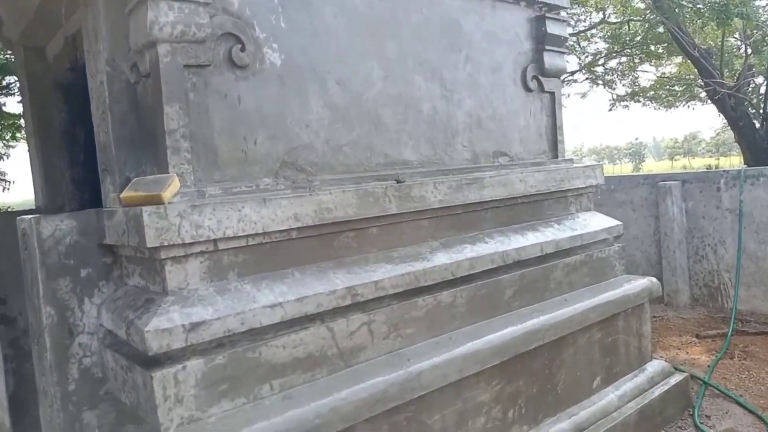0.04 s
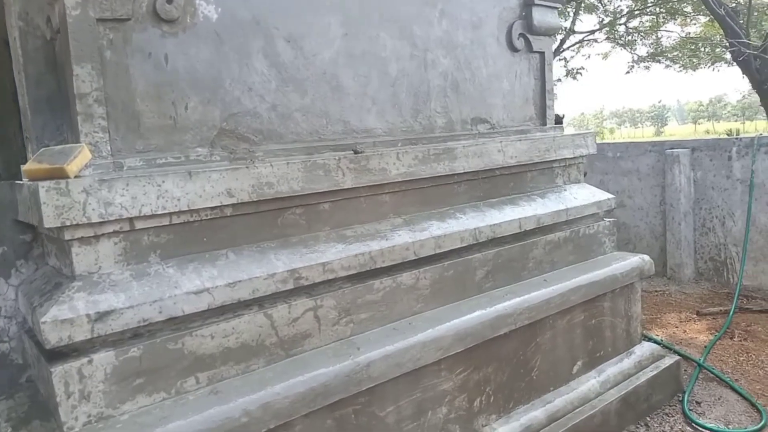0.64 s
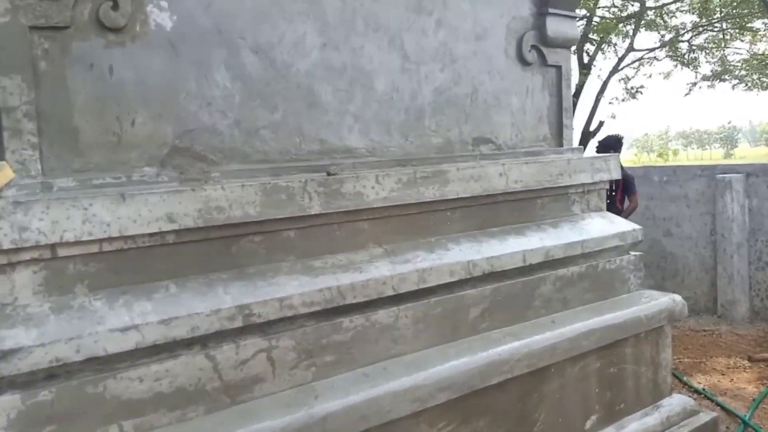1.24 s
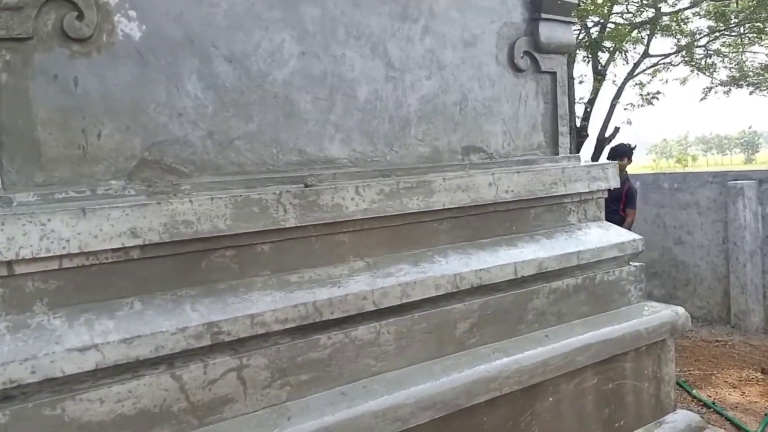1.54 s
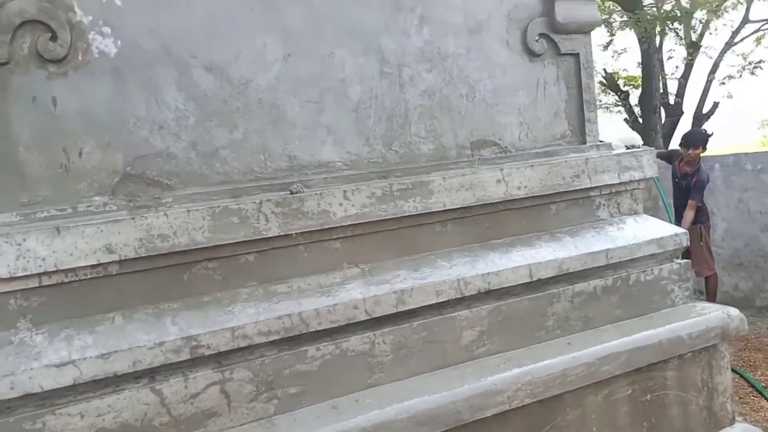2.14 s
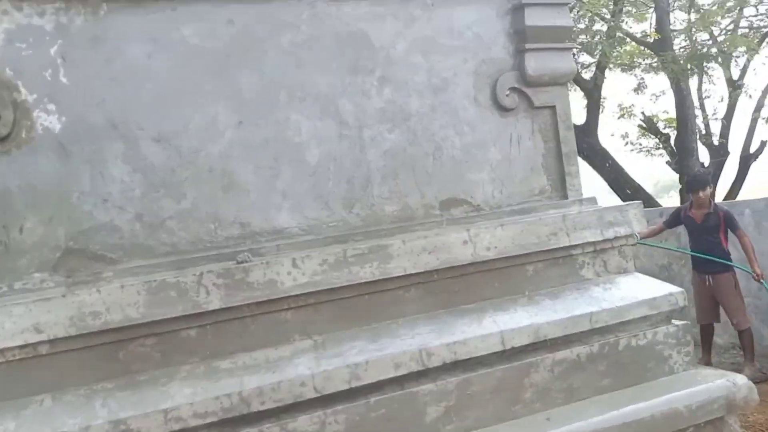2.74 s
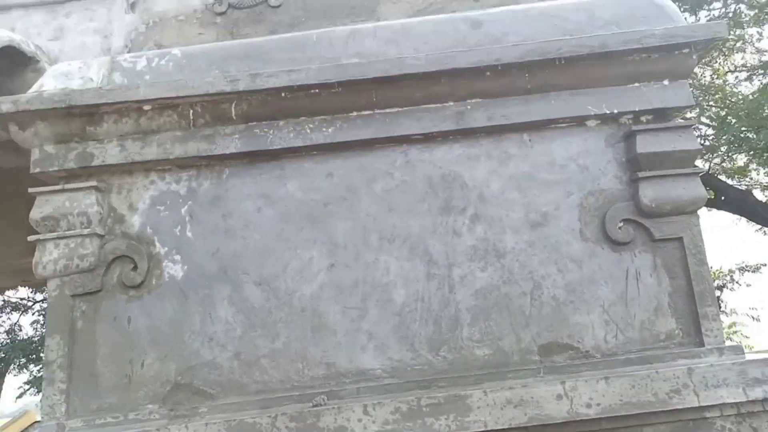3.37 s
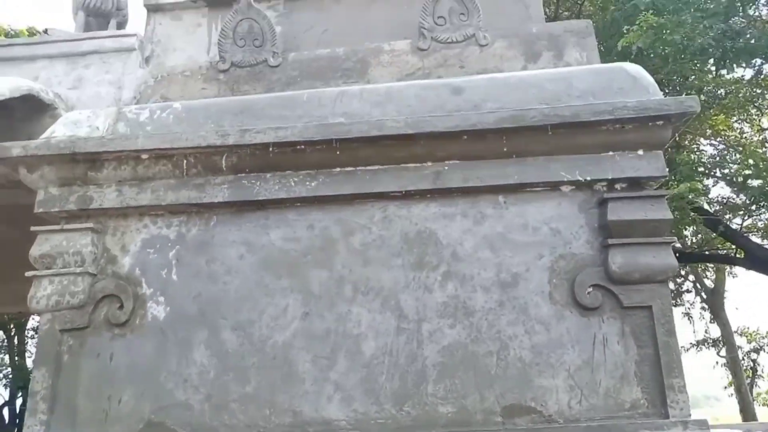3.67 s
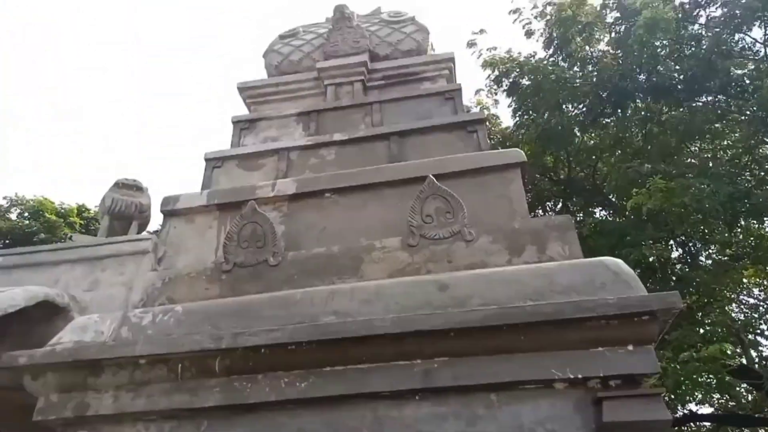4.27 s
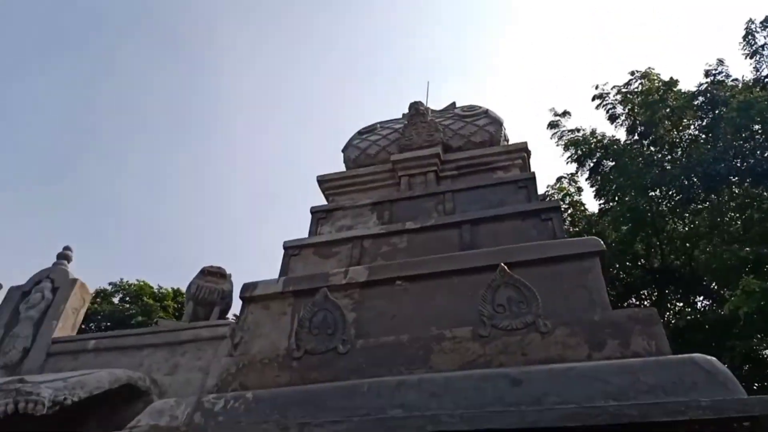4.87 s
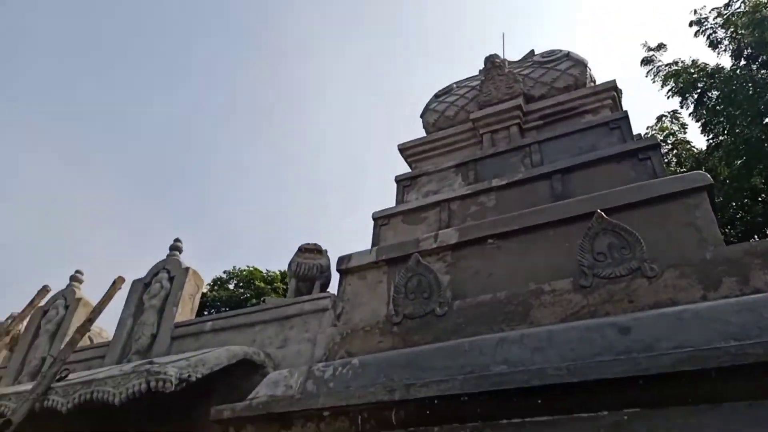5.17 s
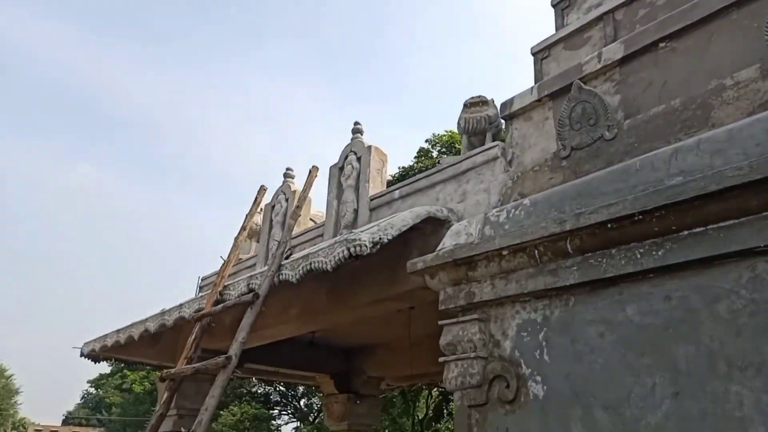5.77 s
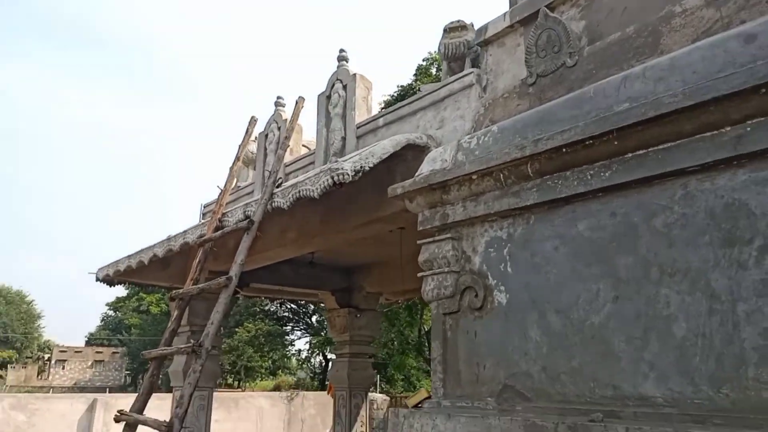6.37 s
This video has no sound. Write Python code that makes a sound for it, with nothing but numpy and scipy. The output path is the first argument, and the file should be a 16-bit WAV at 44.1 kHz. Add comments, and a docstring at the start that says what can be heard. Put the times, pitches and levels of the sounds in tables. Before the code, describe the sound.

Water from a garden hose splashes and hisses against concrete walls outdoors, with dripping and light wind rumbling on the microphone.

```python
"""A garden hose sprays the concrete walls of a building outdoors, a few metres away.
From the start the jet splashes on ledges, hisses as mist and drums on the flat wall, while
water spills down and single drops ring. Near 1.8 s water slaps the wall, then the strongest
gust of a light wind buffets the microphone. The spray is loudest from 3 to 3.6 s, and bubbles
plop in puddles just after. The jet sinks away around 5 s and swells again for the last second."""
import sys
import numpy as np
from scipy import signal
from scipy.fft import rfft, irfft
from scipy.io import wavfile

SR = 44100
rng = np.random.default_rng(int(sys.argv[2]) if len(sys.argv) > 2 else 0)


def pcm_store(signal):
    """Save signal as 16-bit PCM."""
    levels = np.round(np.clip(np.atleast_2d(signal), -1, 1) * 32767)
    wavfile.write(sys.argv[1], SR, levels.astype(np.int16).T)


N = 282681


def gain_of(db):
    """Turns decibels into a number to multiply a sound by."""
    return 10 ** (np.asarray(db) / 20)


def evened(x):
    """Scales a signal to an average strength (rms) of 1."""
    return x / np.sqrt(np.mean(x ** 2) + 1e-20)


def noise(length=N):
    """Plain white noise."""
    return rng.standard_normal(length)


def follow(rows):
    """Joins (time, value) points with straight lines, one value per sample."""
    times, values = np.transpose(rows)
    return np.interp(np.arange(N) / SR, times, values)


def add(mix, s, sound):
    """Mixes a sound in, starting at s seconds."""
    part = mix[max(round(s * SR), 0):][:len(sound)]
    part += sound[:len(part)]


def coloured(x, tone, size=8192):
    """Shapes bass and treble to a tone table; the filter never rings early, so hits stay sharp."""
    hz, db = np.transpose(tone)
    bins_hz = abs(np.fft.fftfreq(size, 1 / SR))
    log_gain = np.log(gain_of(np.interp(np.log(bins_hz + 1), np.log(hz), db)))
    taps = np.fft.ifft(np.exp(np.conj(signal.hilbert(log_gain)))).real[:size // 2]
    return signal.oaconvolve(x, taps)[:len(x)]


def resonate(x, hz, width_hz):
    """Rings at a fixed or moving pitch: shift down to zero, smooth twice, shift back."""
    turn = np.exp(2j * np.pi * np.cumsum(hz * np.ones(len(x))) / SR)
    r = np.exp(-np.pi * width_hz / SR)
    return evened((turn * signal.lfilter([1], [1, -2 * r, r * r], x / turn)).real)


def wander(rate_hz):
    """A random wobble, mostly slower than the given rate."""
    hz = np.fft.rfftfreq(N, 1 / SR)
    return evened(irfft(rfft(noise()) / (1 + (hz / rate_hz) ** 2), N))


def spells(rows, base_db, attack_s, release_s):
    """A loudness curve: spells that rise, hold and die away over a steady base."""
    t, power = np.arange(N) / SR, gain_of(base_db) ** 2
    for s, length, db in rows:
        shape = np.clip((t - s) / attack_s, 0, 1) * np.exp(-np.maximum(t - s - length, 0) / release_s)
        power = power + (gain_of(db) * shape) ** 2
    return np.sqrt(power)


def impacts(per_s, spread_db):
    """Drops hitting at random: many small clicks, a few large."""
    chance, side = rng.random((2, N))
    size = gain_of(spread_db * np.minimum(rng.exponential(1, N), 5))
    return size * np.sign(side - .5) * (chance < per_s / SR)


def ping(hz, cycles, glide, t, swell_cycles=0.35):
    """A pocket of air trapped by a drop: it swells, rings for some cycles and rises in pitch."""
    age = hz * t / cycles
    shape = (1 - np.exp(-(hz * t / swell_cycles) ** 2)) * np.exp(-age)
    return shape / shape.max() * np.sin(2 * np.pi * hz * t * (1 + glide * np.minimum(age, 2)))


def droplets(low_hz, high_hz, per_s, cycles, spread_db, most=6000, size=400):
    """A crowd of ringing drops, each with its own pitch and strength."""
    count = int(per_s * N / SR)
    when, pitch, weakness = rng.random((most, 3))[:count].T[:, :, None]
    hz = low_hz * (high_hz / low_hz) ** pitch
    height = gain_of(-spread_db * np.log(.02 + weakness))
    rings = height * np.sqrt(hz) * ping(hz, cycles, glide=0.013, t=np.arange(size) / SR)
    at = (when * N).astype(int) + np.arange(size)
    return evened(np.bincount(at.ravel(), rings.ravel(), N)[:N])


def yard(x, fade_s=0.17, echo_db=-7, count=24):
    """Adds quick echoes from the walls and the ground; later ones are weaker."""
    delay_s, side = rng.uniform(.004, .09, count), rng.choice([-1, 1], count)
    bounces = np.bincount((delay_s * SR).astype(int), side * gain_of(-60 * delay_s / fade_s))
    echoes = signal.oaconvolve(x, bounces / np.linalg.norm(bounces))[:N]
    return (x + gain_of(echo_db) * echoes) / np.sqrt(1 + gain_of(echo_db) ** 2)


# tone of the open air: f/Hz, level/dB
AIR_TONE = [(20, -13), (60, -27), (130, 6.5), (200, -0.5), (400, 2.5), (800, -8), (2300, 7.5), (4500, -8.5),
            (6700, 0), (7600, -34), (9000, -42), (12500, -44), (15400, -33)]

def air(level_db=-65.0):
    """The faint steady wash of the open yard."""
    return gain_of(level_db) * evened(coloured(noise(), AIR_TONE))


# tone of the wind's rumble: f/Hz, level/dB
WIND_TONE = [(15, -58), (30, -12), (50, -8), (72, -0.5), (95, -4), (125, -8.5), (160, -20.5), (250, -31),
             (600, -66)]
# gusts at the microphone: t/s, length/s, relative level/dB
GUSTS = [(0, 0.25, -66), (.27, 0.038, -53.5), (.56, 0.045, -59), (.88, 0.048, -47.5), (.97, 0.36, -50),
         (1.34, 0.097, -55.5), (1.53, .13, -60), (1.68, 0.18, -50), (1.89, 0.11, -42.5), (2.02, 0.12, -44),
         (2.19, 0.054, -57), (2.38, 0.044, -58), (2.49, 0.04, -55), (2.84, 0.045, -57),
         (2.96, 0.049, -56.5), (3.15, 0.078, -54), (3.33, .06, -54.5), (3.48, .09, -54), (3.62, .08, -51.5),
         (3.75, 0.03, -60), (4.61, 0.029, -65), (5.07, 0.054, -61), (5.58, 0.046, -63), (5.99, 0.037, -74)]
# sudden puffs: t/s, level/dB, f/Hz
PUFFS = [(0.899, -37.5, 86), (1.208, -34, 92), (1.236, -50, 82), (2.962, -45.5, 85), (3.621, -45, 89)]

def wind(puff_s=0.0041):
    """Swirls of air rumble on the microphone, with a few sudden thumps."""
    swirls = evened(coloured(noise(), WIND_TONE))
    gusts = spells(GUSTS, base_db=-80, attack_s=0.025, release_s=0.025)
    out = swirls * gusts * gain_of(-3.0 + 2.2 * wander(rate_hz=6.1))
    t = np.arange(SR // 10) / SR
    shape = t / puff_s * np.exp(1 - t / puff_s)
    for s, db, hz in PUFFS:
        add(out, s, gain_of(db) * shape * np.sin(2 * np.pi * hz * t))
    return out


# tone of the falling water: f/Hz, level/dB
RUNOFF_TONE = [(60, -30), (140, -14.5), (210, -1), (340, 2.5), (490, 3.5), (600, 2.5), (800, -7.5),
               (1200, -29), (3000, -43)]
# note of the hollow between the ledges: t/s, f/Hz
HOLLOW_NOTE = [(0, 500), (.8, 493), (1.0, 310), (2.5, 380), (3.6, 361), (3.9, 500), (4.4, 455), (4.55, 229),
               (5.3, 217), (6.41, 223)]
# water spilling off the ledges: t/s, length/s, relative level/dB
SPILLS = [(0, 0.28, -56), (.45, 0.28, -64.5), (.9, .26, -58), (1.2, 0.26, -65), (1.85, 0.11, -66.5),
          (2.6, 0.63, -63.5), (2.77, 0.061, -52.5), (3.12, 0.29, -54.5), (3.4, 0.28, -59),
          (3.87, 0.077, -61), (4.1, 0.053, -65.5), (4.31, 0.041, -53), (4.4, 0.22, -63.5),
          (4.79, 0.17, -67.5), (5.26, 0.056, -57.5), (5.52, 0.503, -59.5), (6.13, 0.064, -63),
          (6.38, .03, -56)]
# lumps of water landing: t/s, level/dB, f/Hz
THUDS = [(0.959, -59, 320), (3.125, -42.5, 852), (4.325, -54.5, 470), (4.495, -61, 228),
         (5.277, -53.5, 226), (5.994, -62, 218)]

def runoff(swell_s=0.015):
    """Water pours off the ledges and patters dully into a hollow; now and then a lump thuds down."""
    patter = evened(impacts(per_s=820, spread_db=2.0)) + 1.35 * noise()
    hollow = resonate(noise(), follow(HOLLOW_NOTE), width_hz=73)
    spill = spells(SPILLS, base_db=-70, attack_s=0.011, release_s=0.035)
    spill *= gain_of(-3.5 + 2.5 * wander(rate_hz=22))
    out = evened(evened(coloured(patter, RUNOFF_TONE)) + 0.41 * hollow) * spill
    t = np.arange(SR // 8) / SR
    shape = (t / swell_s * np.exp(1 - t / swell_s)) ** 2
    for s, db, hz in THUDS:
        add(out, s, gain_of(db) * shape * resonate(noise(len(t)), hz, width_hz=88))
    return out


# bubbles bursting in puddles: t/s, relative level/dB, f/Hz
BUBBLES = [(3.677, -44, 1160), (3.722, -38, 1034), (4.041, -45, 1210), (4.148, -43, 1100),
           (5.925, -47, 1080), (6.242, -45.5, 1060)]

def bubbles(trim_db=-3.5):
    """Larger bubbles plop with a slightly rising note."""
    t, out = np.arange(SR // 15) / SR, np.zeros(N)
    for s, db, hz in BUBBLES:
        add(out, s, gain_of(db + trim_db) * ping(hz, cycles=4.4, glide=0.012, t=t, swell_cycles=2.3))
    return out


# tone of a round smack: f/Hz, level/dB
SMACK_TONE = [(250, -22), (600, -20), (900, 16), (1600, 18.5), (2400, 12), (3500, -33), (6300, -54),
              (8600, -56)]
# tone of fine spray, also used by drops and mist: f/Hz, level/dB
SPRAY_TONE = [(2000, -15), (3200, -2.5), (3900, 1.5), (5100, 1), (5800, 3.5), (6600, 5), (7300, 0),
              (7800, -8.5), (8400, -18.5), (9500, -25.5), (12000, -45.5)]
# slaps on the wall: t/s, level/dB, share of spray (0 to 1), rise time/s
SLAPS = [(.824, -48, 1, 0.0017), (0.919, -40.5, .5, 0.0052), (1.53, -42, 1, 0.0051),
         (1.745, -44, 0, 0.0035), (1.754, -28.5, 0.41, 0.0016), (1.765, -29.5, 0.21, 0.0014),
         (1.776, -40, 0, 0.0016), (3.138, -37, 0.4, 0.0044), (3.804, -56, 0.4, 0.0024),
         (5.181, -53, 0.36, 0.0017), (5.959, -38, 0.86, 0.0014), (6.13, -51, 0.37, 0.0017)]

def slaps(tail_s=0.01, tail_gain=0.037):
    """A lump of water bursts on the concrete with a smack and scatters as spray."""
    t, out = np.arange(SR // 10) / SR, np.zeros(N)
    for s, db, bright, rise_s in SLAPS:
        shape = t / rise_s * np.exp(1 - t / rise_s) + tail_gain * np.exp(-t / tail_s)
        smack = evened(coloured(noise(len(t)), SMACK_TONE))
        spray = evened(coloured(noise(len(t)), SPRAY_TONE))
        add(out, s, gain_of(db) * shape * ((1 - bright) * smack + bright * spray))
    return out


# single fat drops: t/s, level/dB, f/Hz, tick compared with ring/dB
FAT_DROPS = [(.1, -37, 2080, -16), (.3595, -39, 1940, -15), (0.734, -28, 6260, -22),
             (.8354, -34.5, 2260, -16), (1.078, -34, 2380, -13), (1.4246, -31, 6530, -12),
             (1.685, -34.5, 1830, -15), (2.1892, -37.5, 1750, -1), (2.3307, -37, 2450, -16),
             (2.655, -31, 2220, -21), (2.9336, -31, 2180, -14), (2.946, -28, 7140, -18),
             (2.971, -32, 1900, -17), (3.084, -31.5, 2270, -20), (3.106, -29.5, 1970, -13),
             (3.418, -29.5, 2800, -19), (3.5594, -26.5, 2240, -20), (3.59, -25.5, 2250, -13),
             (3.615, -33.5, 1790, -10), (3.805, -34, 2740, -25), (4.116, -34.5, 2220, -20),
             (4.1677, -33.5, 2460, -21), (4.656, -40, 2650, -5), (4.696, -38, 2520, -16),
             (5.053, -43.5, 2330, -3.5), (5.093, -42, 3260, -4), (5.116, -41.5, 2830, -1),
             (5.3531, -42, 2300, -15)]

def drops(jet_db, tick_s=0.0019, stray_count=36, stray_hz=2250):
    """A fat drop gives a wet tick and a short ring; strays fall at random, louder with a strong jet."""
    t, out = np.arange(SR // 25) / SR, np.zeros(N)
    strays = []
    for when, big, high in rng.random((stray_count, 3)):
        db = jet_db[int(when * N)] + 8 + 4 * (big - .5)
        hz = stray_hz * 2 ** (0.78 * (high - .5))
        strays.append((when * N / SR, db, hz, -13))
    for s, db, hz, tick_db in FAT_DROPS + strays:
        tick = evened(coloured(noise(len(t)), SPRAY_TONE)) * np.exp(-t / tick_s)
        ring = ping(hz, cycles=6.9, glide=0.0056, t=t, swell_cycles=2.1)
        add(out, s, gain_of(db) * (ring + gain_of(tick_db) * tick))
    return out


# tone of the very high fizz: f/Hz, level/dB
FIZZ_TONE = [(5000, -30), (8000, 0), (9000, 1.5), (10000, -0.5), (11300, 0.5), (12600, -2.5), (14000, 3),
             (15400, 3)]

def fizz(hits):
    """The tiniest drops tick on their own, above the rest of the spray."""
    ticks = evened(impacts(per_s=3100, spread_db=7.0))
    return coloured(.5 * hits + 0.46 * ticks + 0.97 * noise(), FIZZ_TONE)


# tone of water hitting the bare wall: f/Hz, level/dB
DRUM_TONE = [(300, -35.5), (550, -15), (760, -3), (900, -3), (1100, 1.5), (1400, 0.5), (2000, 2.5),
             (4000, -31.5)]
# ringing of the wall's corner: t/s, strength (1 = as strong as the wall)
CORNER_RING = [(0, 0.91), (.8, 0.59), (1.3, 0.37), (2.5, 0.21), (2.8, 0.3), (3.4, 0.45), (3.7, .05),
               (5.4, 0.09), (6.41, 0.14)]

def drumming(hits, wash):
    """The bare wall answers with a lower sound, and its corner rings at one pitch."""
    gurgling = yard(droplets(567, 1723, per_s=300, cycles=3.9, spread_db=6.0))
    corner = follow(CORNER_RING) * resonate(noise(), hz=845, width_hz=244)
    return evened(coloured(hits + 1.28 * wash + 0.46 * gurgling, DRUM_TONE)) + corner


def mist(hits, wash):
    """Small drops bounce back, hissing and tinkling."""
    tinkling = yard(droplets(3350, 7640, per_s=450, cycles=11.8, spread_db=5.0))
    return coloured(hits + 1.59 * wash + 0.46 * tinkling, SPRAY_TONE)


# tone of the splash: f/Hz, level/dB
SPLASH_TONE = [(700, -33.5), (1300, -9.5), (1550, -7.5), (1800, -1.5), (2250, -0.5), (2700, 0),
               (3300, -2.5), (4500, -4), (7000, -12.5), (9000, -63.5)]
# note set by the film of water under the jet: t/s, f/Hz
FILM_NOTE = [(0, 2160), (1.0, 2070), (1.5, 2250), (1.8, 1990), (2.5, 2260), (3.6, 2270), (3.85, 2570),
             (4.1, 2340), (4.75, 2560), (5.25, 1960), (6.0, 2220), (6.3, 2500)]

def splash(hits, wash):
    """On wet ledges the drops trap air and ring, most near the note of the water film."""
    ringing = yard(droplets(1400, 3445, per_s=450, cycles=6.2, spread_db=2.0))
    film = resonate(impacts(per_s=1300, spread_db=3.5), follow(FILM_NOTE), width_hz=680)
    return evened(coloured(hits + 0.69 * wash + .5 * ringing, SPLASH_TONE)) + 0.49 * film


# the jet catches a ledge: t/s, rise time/s, fade time/s, splash level/dB, mist level/dB, drum level/dB
SURGES = [(.47, .03, 0.034, -47, -48, -54), (.815, 0.018, .035, -44, -44.5, -74),
          (.895, 0.04, 0.079, -48.5, -47.5, -47.5), (1.31, 0.023, 0.034, -51, -45.5, -52),
          (1.405, 0.02, 0.05, -54, -51, -69), (1.49, 0.024, 0.042, -49.5, -47, -73),
          (1.665, 0.019, 0.021, -46, -46.5, -58), (1.745, 0.022, 0.033, -41.5, -54, -45.5),
          (1.89, 0.013, 0.064, -50.5, -46.5, -64), (2.24, 0.042, 0.13, -46, -55, -80),
          (2.64, 0.031, 0.11, -44, -50, -65), (2.85, 0.073, .07, -41, -44, -61),
          (3.1, 0.049, 0.078, -36.5, -42.5, -48), (3.55, 0.048, 0.043, -40.5, -53, -66),
          (3.797, .004, 0.09, -43.5, -49.5, -59), (3.82, 0.052, 0.11, -46.5, -46, -70),
          (4.085, 0.013, 0.19, -46, -70, -67), (4.3, 0.039, 0.046, -41.5, -46, -56),
          (4.785, 0.018, 0.044, -45.5, -51.5, -62), (4.87, 0.018, 0.14, -51.5, -57, -61.5),
          (5.26, 0.022, .045, -56, -49.5, -54), (6.127, 0.0037, 0.07, -49.5, -54, -69),
          (6.13, 0.027, 0.065, -46, -49.5, -60)]

def surges():
    """Extra loudness for splash, mist and drumming at each ledge: a quick rise, then a fade."""
    t, power = np.arange(N) / SR, np.zeros((3, N))
    for s, rise_s, fade_s, *db in SURGES:
        shape = np.clip((t - s) / rise_s, 0, 1) * np.exp(-np.maximum(t - s - rise_s, 0) / fade_s)
        power += (gain_of(db)[:, None] * shape) ** 2
    return np.sqrt(power)


# a slanting jet throws more mist: t/s, mist level compared with the jet/dB
SLANT = [(0, 8), (.4, -1), (1.15, -1.5), (1.5, 2), (2.3, -.5), (3, .5), (3.75, -2.5), (4.2, -4), (4.8, 0.5),
         (5.4, -6), (6.41, -6)]
# a head-on jet drums more: t/s, drum level compared with the jet/dB
HEAD_ON = [(0, -3.5), (.45, -8), (.8, -7.5), (1.47, -7), (1.6, -23), (1.9, -7.5), (2.22, -14.5),
           (2.45, -6.5), (2.96, -6), (3.08, -18), (3.3, -7.5), (3.6, -20.5), (4.5, -10.5), (5.1, -10),
           (5.4, -15), (5.6, -6.5), (6.41, -19.5)]

def flow(jet_db):
    """Loudness of splash, mist, drumming and fizz: the swaying jet shared out by angle, plus surges."""
    swaying_db = jet_db + 0.59 * wander(rate_hz=7.3)
    slant_db = follow(SLANT)
    splash_db = swaying_db + wander(rate_hz=17)
    mist_db = swaying_db + slant_db
    drum_db = swaying_db + follow(HEAD_ON) + 2.5 * wander(rate_hz=5)
    fizz_db = -29.5 + 0.79 * swaying_db + 1.07 * slant_db + wander(rate_hz=29)
    steady = gain_of([splash_db, mist_db, drum_db, fizz_db])
    more_splash, more_mist, more_drum = surges()
    more_fizz = gain_of(-19.0) * more_mist
    return np.hypot(steady, [more_splash, more_mist, more_drum, more_fizz])


def jet(jet_db):
    """The stream breaks into clumps of drops; the same hits feed all four of its sounds."""
    clumps_db = 0.36 * wander(rate_hz=67) + 0.62 * wander(rate_hz=65)
    hits = evened(yard(impacts(per_s=3600, spread_db=3.5)))
    wash = noise()  # countless drops too small to tell apart
    sounds = splash(hits, wash), mist(hits, wash), drumming(hits, wash), fizz(hits)
    water = sum(evened(sound) * level for sound, level in zip(sounds, flow(jet_db)))
    return water * gain_of(clumps_db)


# strength of the jet as it sweeps along the building: t/s, level/dB
JET_SWEEP = [(0, -53), (.27, -52.5), (.42, -48), (1.25, -50.5), (2.05, -50.5), (2.55, -49.5), (2.9, -46),
             (3.3, -45), (3.6, -44.5), (3.77, -50), (4.07, -55.5), (4.22, -48.5), (4.55, -54), (5.17, -64),
             (5.215, -50.5), (5.8, -46), (6.11, -51), (6.41, -50.5)]

def scene():
    """Water in the yard and wind at the microphone, in one channel."""
    jet_db = follow(JET_SWEEP)
    splats = yard(drops(jet_db) + slaps() + bubbles(), fade_s=0.26, echo_db=-7.5)
    return (jet(jet_db) + runoff() + splats + wind() + air())[None]


def record(dry, low_cut_hz=42, high_cut_hz=15560):
    """The microphone loses the deepest bass and the recorder the highest treble."""
    low_cut = signal.butter(4, low_cut_hz, "highpass", fs=SR, output="sos")
    high_cut = signal.firwin(1023, high_cut_hz, window=("kaiser", 9), fs=SR)
    return signal.oaconvolve(signal.sosfilt(low_cut, dry), high_cut[None], "same")


dry = scene()
out = record(dry)
pcm_store(out)
```